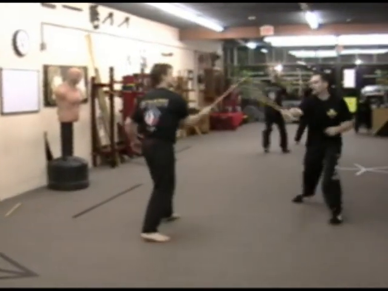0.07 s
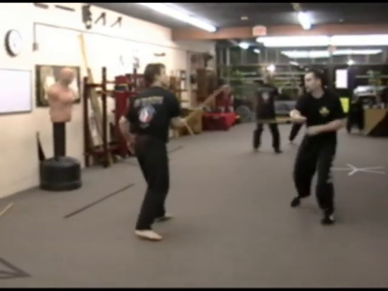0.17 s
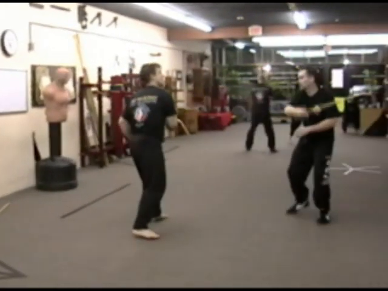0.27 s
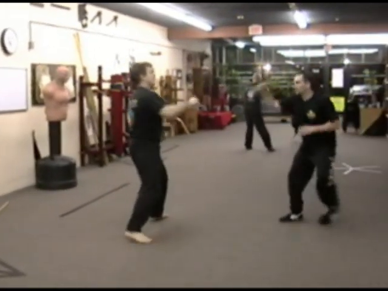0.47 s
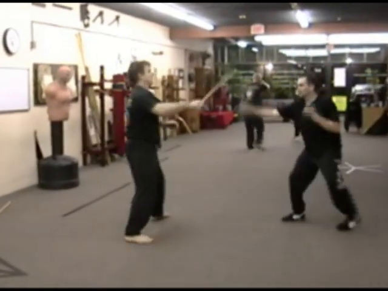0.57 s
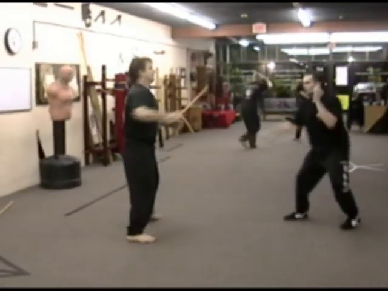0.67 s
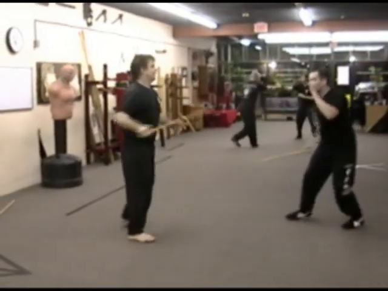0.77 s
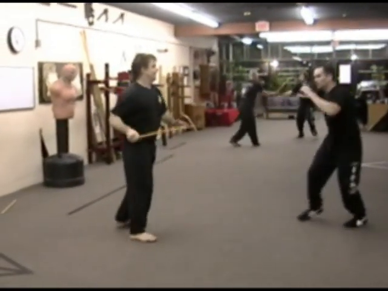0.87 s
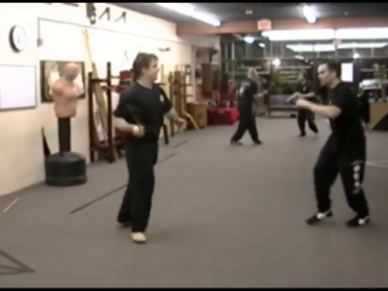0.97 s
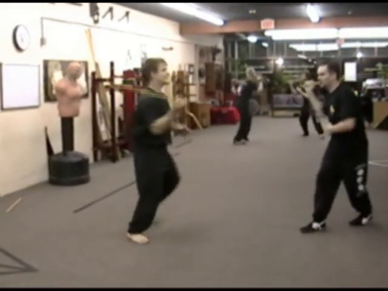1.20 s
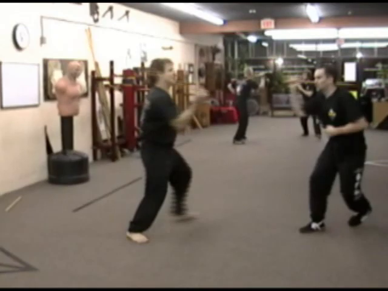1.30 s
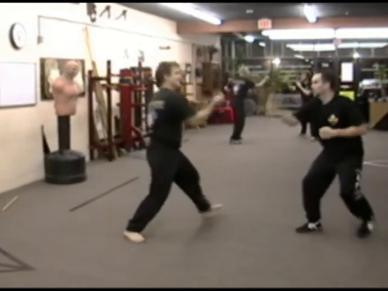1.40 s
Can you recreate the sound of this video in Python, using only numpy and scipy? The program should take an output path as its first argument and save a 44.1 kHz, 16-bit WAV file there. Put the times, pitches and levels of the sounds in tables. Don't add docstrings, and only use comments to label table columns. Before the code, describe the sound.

Wooden sticks clack sharply in a reverberant training hall. Soft foot knocks and a brush at 0.15 seconds precede the hardest crack at 0.23, a softer one at 0.37, another hard one at 0.72 and a lesser one at 0.96, followed at once by a loud swish. A dull knock with a tick lands at 1.38. Ventilation rumbles below; the camera microphone overloads and ducks.

```python
import sys
import numpy as np
from scipy import signal
from scipy.io import wavfile
from scipy.ndimage import uniform_filter1d

SR = 44100
rng = np.random.default_rng(int(sys.argv[2]) if len(sys.argv) > 2 else 0)


def boost(x):
    u = np.asarray(x, float) / 20
    return 10 ** u


def pcm_store(signal):
    levels = np.round(np.clip(np.atleast_2d(signal), -1, 1) * 32767)
    wavfile.write(sys.argv[1], SR, levels.astype(np.int16).T)


N = 63945


def rms_one(x):
    return x / np.sqrt(np.mean(x ** 2) + 1e-20)


def at_hz(points, hz):
    points = np.array(points)
    return np.interp(np.log(hz + 1), np.log(points[:, 0]), points[:, 1])


def since(s):
    t = np.arange(N) / SR - s
    return np.maximum(t, 0), t >= 0


def ring(s, hz, t60):
    t, on = since(s)
    return on * np.sin(2 * np.pi * hz * t) * boost(-60 * t / t60)


def swell(s, length):
    return np.sin(np.pi * np.clip(since(s)[0] / length, 0, 1)) ** 0.4


def band(x, low_hz, high_hz):
    limits = [max(low_hz, 20), min(high_hz, 19000)]
    return signal.sosfilt(signal.butter(2, limits, "band", fs=SR, output="sos"), x)


def high_pass(x, hz, order):
    return signal.sosfilt(signal.butter(order, hz, "high", fs=SR, output="sos"), x)


def drift(rate):
    r = np.exp(-80 * np.pi * rate / SR)
    chance = rng.standard_normal(N // 40 + 2002)
    slow = signal.lfilter([1], [1, -2 * r, r * r], chance)[2000:]
    return np.interp(np.arange(N) / 40, np.arange(len(slow)), rms_one(slow))


def half_octaves():
    edges = 35 * 2 ** np.arange(0, 9.1, .5)
    return zip(edges, edges[1:])


def air():
    # (frequency [Hz], level per Hz [dB])
    air_colour = [(24, -51), (40, -16.5), (239, -6), (490, -21), (612, -10.5), (693, -18.5), (804, -24.5),
                  (4560, -32.5), (15000, -45)]
    level_db, lumps_db = -40.5, 2.0
    white = rng.standard_normal((2, N + 8000))
    together = drift(8)
    total = np.zeros(N)
    for k, (low, high) in enumerate(half_octaves()):
        waver_db = lumps_db * (.6 * together + .7 * drift(15))
        band_db = at_hz(air_colour, np.sqrt(low * high)) + waver_db
        total += band(white[k % 2], low, high)[-N:] * boost(band_db)
    return boost(level_db) * rms_one(total)


def hall(x):
    # (frequency [Hz], time to fall 60 dB [s])
    hall_t60 = [(200, 1), (1500, 0.93), (3000, 0.63), (5000, .55), (8000, 0.49), (14000, 0.04)]
    hall_db, gap_s, build_s = -26, 0.0049, 0.024
    echo_spread_db, echoes_fuse_s = 9, 0.03
    t, on = since(gap_s)
    uneven = np.minimum(rng.exponential(1, N), 3) - 1
    echoes = rng.standard_normal((2, N)) * boost(echo_spread_db * np.exp(-t / echoes_fuse_s) * uneven)
    echoes *= on * (1 - 0.53 * np.exp(-t / build_s))
    response = np.zeros(N)
    for k, (low, high) in enumerate(half_octaves()):
        if low > 100:
            t60 = at_hz(hall_t60, np.sqrt(low * high))
            response += band(echoes[k % 2], low, high) * boost(-60 * t / t60)
    return boost(hall_db) * signal.fftconvolve(x, response)[:N]


def early_echoes(x):
    # (delay [s], level [dB])
    bounces = [(.0023, -2.5), (.0045, -7.5), (.0074, -4.5), (.009, -12.5), (.0123, -22), (.0153, -10.5),
               (.0178, -7)]
    taps = np.zeros(2048)
    for delay, db in bounces:
        shift, change = rng.standard_normal(2)
        taps[int(delay * (1 + .04 * shift) * SR)] = boost(db + 2.0 * change)
    return signal.fftconvolve(x, taps)[:N]


def knocks():
    # (time [s], peak level [dB], pitch [Hz], time to fall 60 dB [s])
    knock_list = [
        (.144, -29.5, 594, 0.028),
        (0.157, -28.5, 260, 0.065),
        (1.3818, -19, 625, 0.069),
    ]
    out = np.zeros(N)
    for s, db, hz, t60 in knock_list:
        out += boost(db) * (ring(s, hz, t60) + .5 * ring(s + 0.00065, 1.6 * hz, 0.8 * t60))
    return out


def ticks():
    # (time [s], peak level [dB], centre pitch [Hz], width [Hz])
    tick_list = [
        (0.156, -30.5, 2220, 1470),
        (1.321, -55, 8800, 6000),
        (1.3827, -19, 3020, 4960),
    ]
    out = np.zeros(N)
    for s, db, hz, width_hz in tick_list:
        t, on = since(s)
        noise = rms_one(band(rng.standard_normal(N), hz - width_hz / 2, hz + width_hz / 2))
        out += noise * on * boost(db - 9 - 60 * t / 0.06)
    return out


def swishes():
    # (start [s], length [s], level [dB], centre pitch [Hz])
    swish_list = [
        (0.13, 0.1, -44.5, 1020),
        (0.152, 0.041, -44.5, 3560),
        (0.618, 0.014, -31.5, 4400),
        (0.666, 0.057, -48.5, 9600),
        (.9, 0.044, -67, 9000),
        (0.975, 0.072, -12, 4540),
        (1.29, 0.17, -55.5, 10000),
    ]
    out = np.zeros(N)
    for s, length, db, hz in swish_list:
        noise = band(rng.standard_normal(N), hz / 2, hz * 1.4)
        noise = rms_one(band(noise, hz / 3, hz * 1.5))
        out += boost(db + 3 * drift(60)) * swell(s, length) * noise
    return out


def squeak():
    start_s, length_s, pitch_hz, level_db = .155, .05, 3330, -49.5
    noise = rms_one(band(rng.standard_normal(N), pitch_hz - 40, pitch_hz + 40))
    return boost(level_db) * swell(start_s, length_s) * noise


def stick_strike(s, db, low_hz, modes, ring_share):
    crack_db, crack_high_hz, contact_s = 13.5, 7020, 0.00026
    body_db, body_low_hz = -19.5, 510
    click = np.zeros(N) + 1e-18
    click[int(s * SR)] = boost(crack_db)
    wood = np.zeros(N)
    for hz, mode_db, t60 in modes:
        share = ring_share if hz > 2300 else 1
        wood += boost(mode_db) * ring(s, hz, t60 * share)
    onset = 1 - np.exp(-since(s)[0] / contact_s)
    clack = band(click + wood * onset, low_hz, crack_high_hz)
    clack = high_pass(clack, .9 * low_hz, 4)
    body = boost(body_db) * band(click, body_low_hz, low_hz)
    return boost(db - 13.5) * (clack + body)


def ports(shared, apart):
    port_hz, port_q = 5530, 2.22
    null_hz, null_width_hz = 7600, 950
    side_from_hz = 2360
    w = 2 * np.pi * port_hz / SR
    damping = np.sin(w) / 2 / port_q
    top = (1 - np.cos(w)) * np.array([.5, 1, .5])
    bottom = [1 + damping, -2 * np.cos(w), 1 - damping]
    own = boost(-4) * band(apart, 3800, 6800) + band(apart, 9500, 11000)
    left = signal.lfilter(top, bottom, shared + own)
    edges = [null_hz - null_width_hz / 2, null_hz + null_width_hz / 2]
    null = signal.butter(2, edges, "bandstop", fs=SR, output="sos")
    mid = signal.sosfiltfilt(null, left + shared) / 2
    differ = signal.butter(3, side_from_hz, "high", fs=SR, output="sos")
    side = signal.sosfiltfilt(differ, (left - shared) / 2)
    return np.array([mid + side, mid - side])


def scene():
    # (time [s], strength [dB], lowest pitch the contact excites [Hz])
    strikes = [
        (.2331, 28.5, 2315),
        (.3682, 18, 1560),
        (.7247, 24.5, 1890),
        (.9617, 19.5, 1524),
    ]
    # (pitch [Hz], level [dB], time to fall 60 dB [s])
    stick_modes = [
        [(2500, -33, 0.004), (3160, 6.5, 0.0079), (3430, 9.5, 0.0027), (4433, 18.5, 0.0033),
         (5088, 7.5, 0.0068), (6000, -5, 0.017)],
        [(1715, -11, 0.011), (2830, -22, 0.0061), (3630, 10.5, 0.0055), (4400, 0, 0.019), (5170, 10.5, 0.0084),
         (5600, -17, .006)],
        [(2090, -6.5, 0.0067), (2610, 6, 0.0074), (3278, 8, 0.0096), (3872, 3, 0.028), (4460, 11.5, 0.011),
         (5003, -7, 0.021)],
        [(1640, -19.5, 0.0085), (2227, -13, 0.023), (3668, -6, 0.042), (4264, 0, 0.028), (5282, 4.5, 0.015),
         (5706, 2.5, 0.01)],
    ]
    # (pitch [Hz], level re strike [dB], time to fall 60 dB [s])
    free_modes = [(3110, -31, 0.11), (4460, -29, 0.055), (3800, -31, 0.037), (3601, -22, 0.037)]
    small_hall_db, off_axis_ring = -16, .35
    direct, sideways = np.zeros(N), []
    for (s, db, low_hz), modes, (hz, free_db, t60) in zip(strikes, stick_modes, free_modes):
        direct += stick_strike(s, db, low_hz, modes, 1)
        to_walls = stick_strike(s, db, low_hz, modes, off_axis_ring)
        sideways.append(to_walls + boost(db + free_db) * ring(s, hz, t60))
    small = knocks() + ticks() + swishes() + squeak()
    small_to_hall = boost(small_hall_db) * small
    room = hall(small_to_hall)
    for x in sideways:
        room += early_echoes(x) + hall(x)
    shared = direct + small + room + air()
    apart = hall(sum(sideways) + small_to_hall) + air()
    return ports(shared, apart)


def gain_control(x):
    threshold_db, squeeze, attack_s = -27.5, 0.39, .005
    release_db_per_s, sense_s = 160, 0.001
    width = int(sense_s * SR)
    power = uniform_filter1d(np.mean(x ** 2, axis=0), width, origin=(width - 1) // 2)
    level_db = 10 * np.log10(power + 1e-12)
    fall = release_db_per_s * np.arange(N) / SR
    peak_db = np.maximum.accumulate(level_db + fall) - fall
    over_db = np.maximum(peak_db - threshold_db, 0)
    r = np.exp(-1 / (attack_s * SR))
    return x * boost(-squeeze * signal.lfilter([1 - r], [1, -r], over_db))


def overload(x):
    clip_up, clip_down = 1.04, 1.08
    thump_db, thump_hz, thump_right = -19.5, 260, 0.2
    top = np.where(x > 0, clip_up, clip_down)
    x = x / (1 + np.abs(x / top) ** 6) ** (1 / 6)
    excess = np.maximum(np.abs(x[0]) - .8, 0)
    thump = signal.sosfilt(signal.butter(2, thump_hz, fs=SR, output="sos"), excess)
    return x + boost(thump_db + 15) * np.array([[1], [thump_right]]) * thump


def low_pass(x):
    return signal.sosfilt(signal.butter(12, 15730, fs=SR, output="sos"), x)


def record(dry):
    coupling_hz, cutoff_hz = 97, 15750
    x = overload(gain_control(dry))
    x = high_pass(x, coupling_hz, 2)
    x = signal.sosfilt(signal.cheby2(10, 45, cutoff_hz * 1.02, fs=SR, output="sos"), x)
    x = np.clip(x, -1, 1)
    return low_pass(x)


dry = scene()
out = record(dry)
pcm_store(out)
```